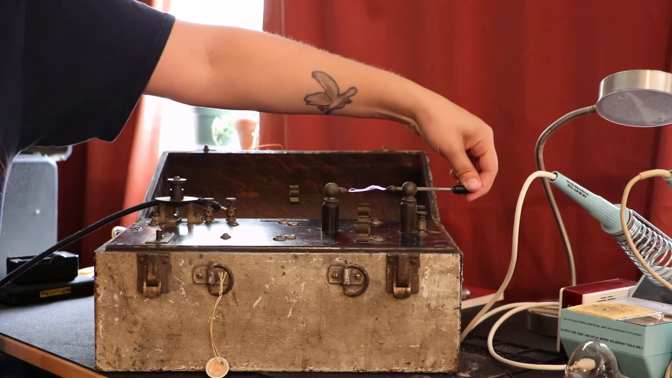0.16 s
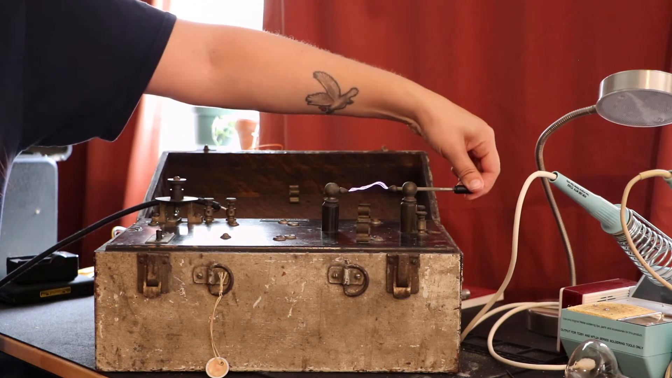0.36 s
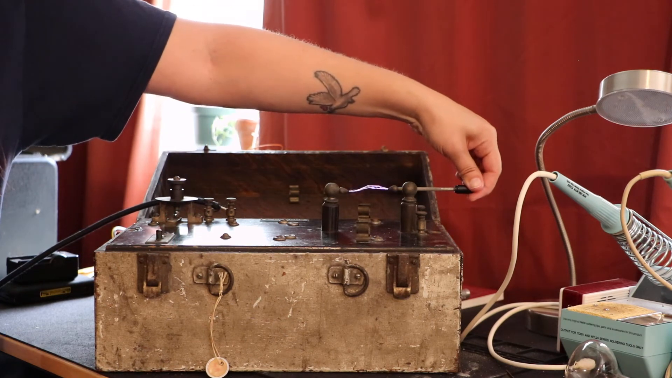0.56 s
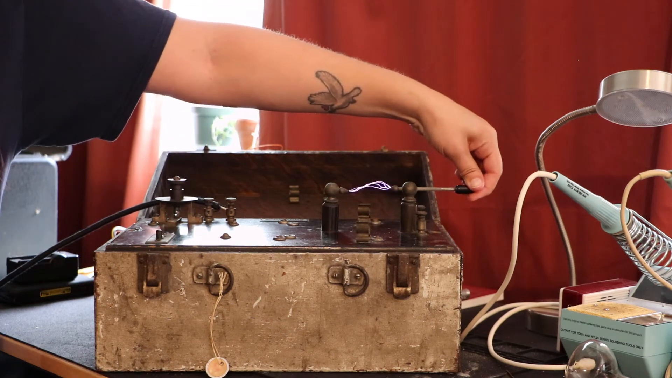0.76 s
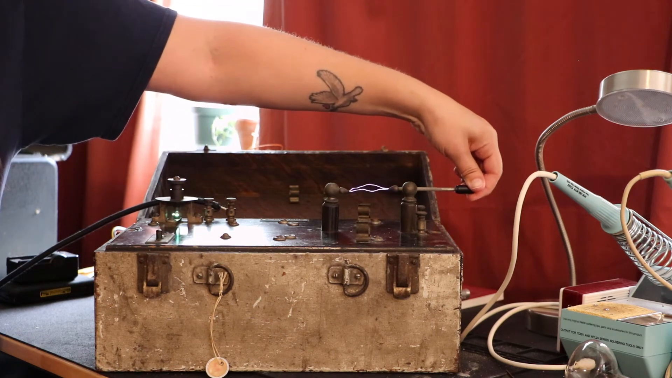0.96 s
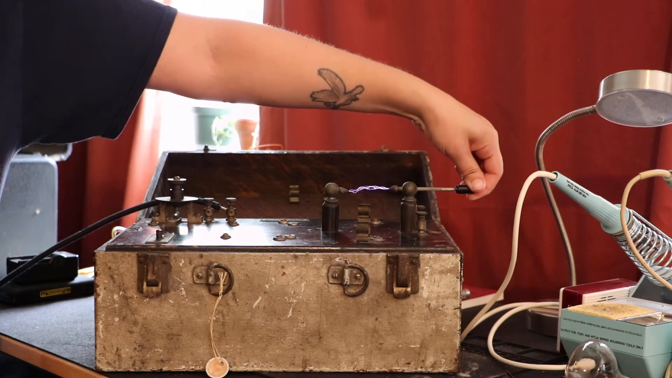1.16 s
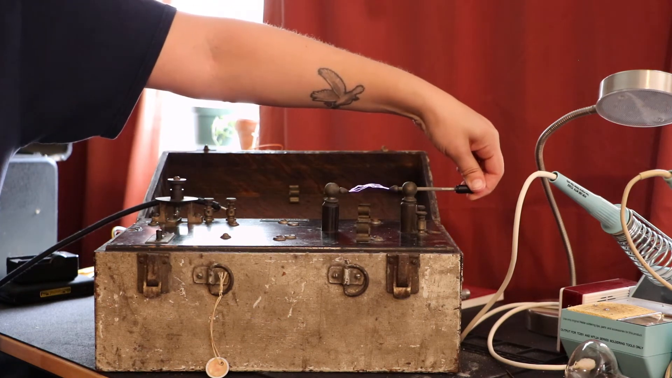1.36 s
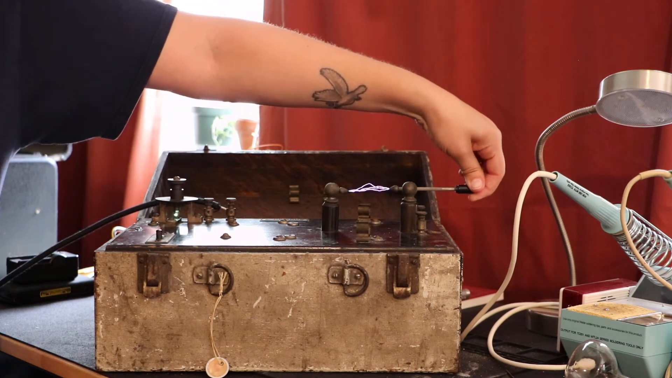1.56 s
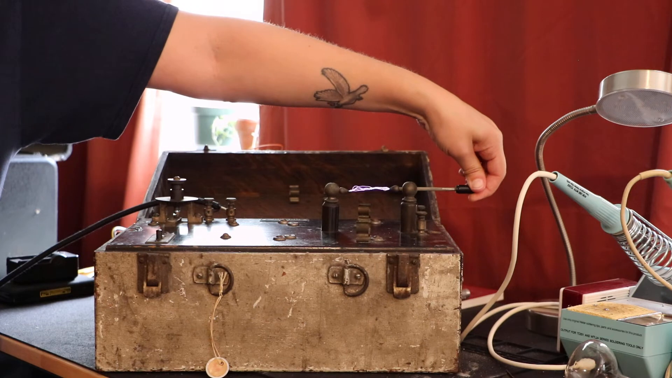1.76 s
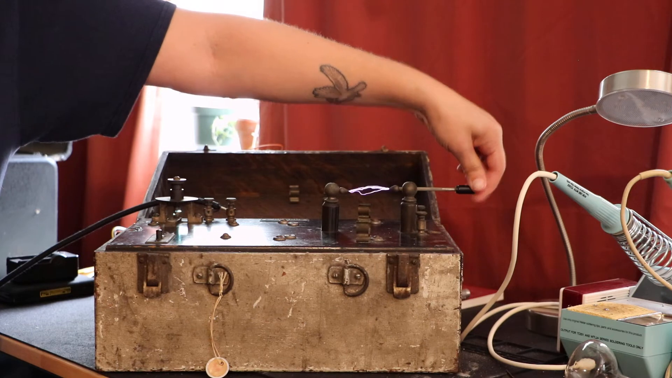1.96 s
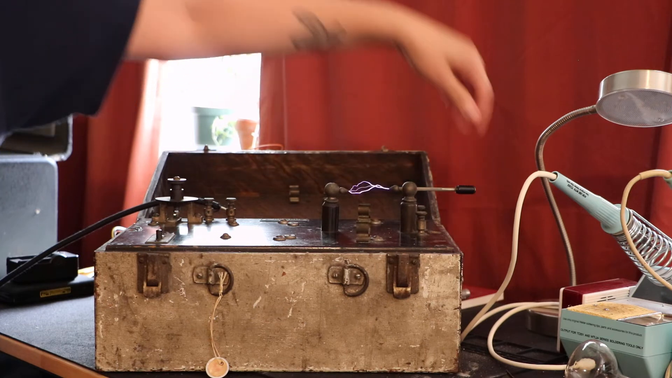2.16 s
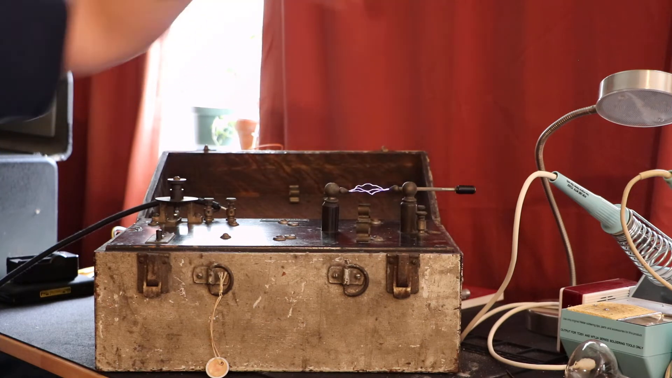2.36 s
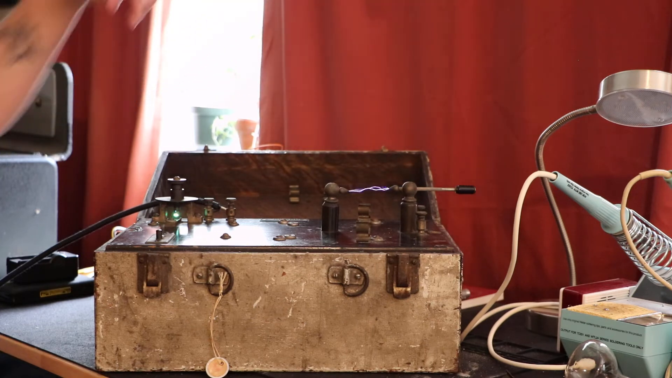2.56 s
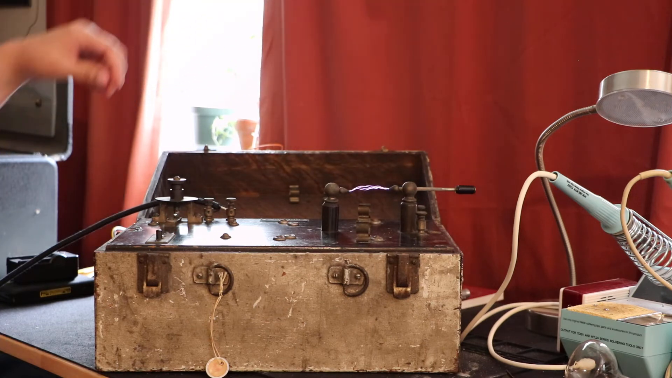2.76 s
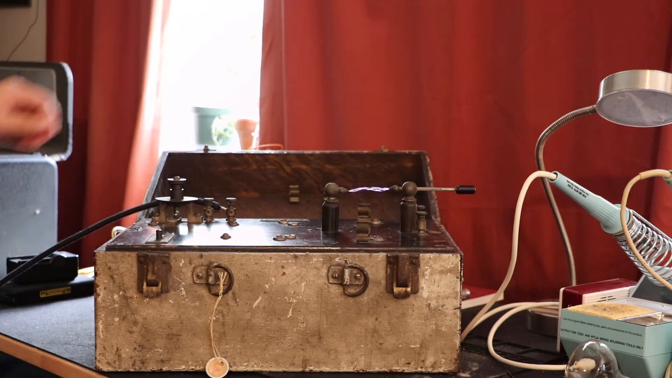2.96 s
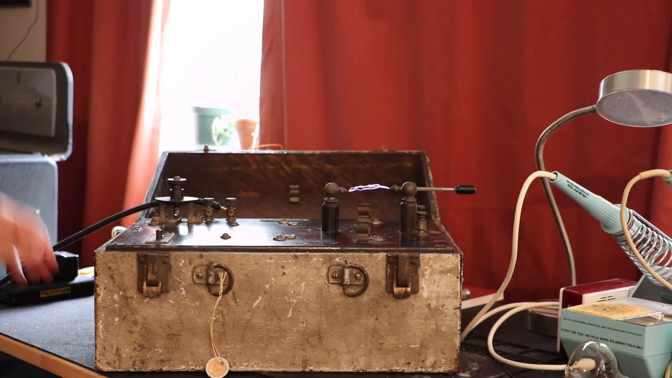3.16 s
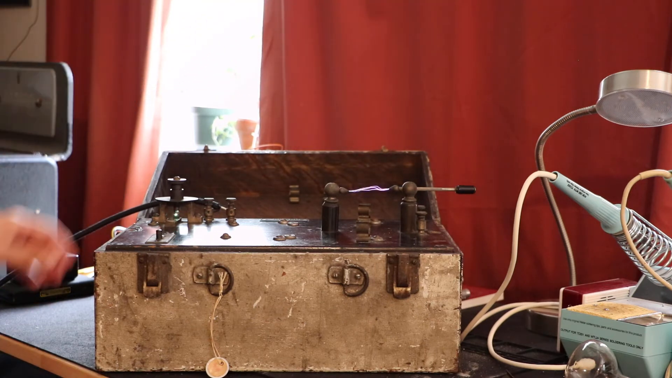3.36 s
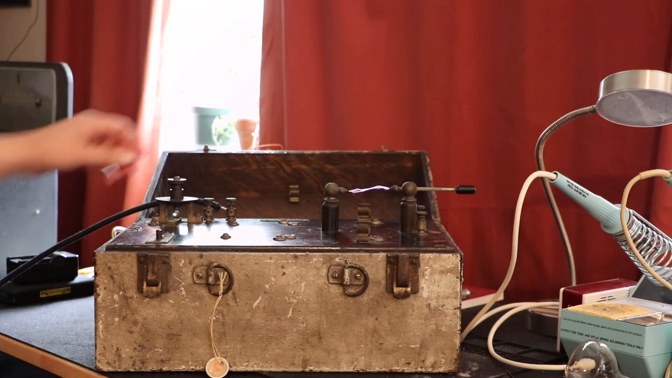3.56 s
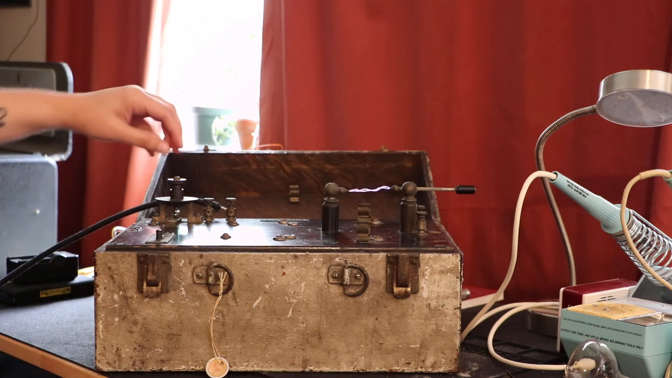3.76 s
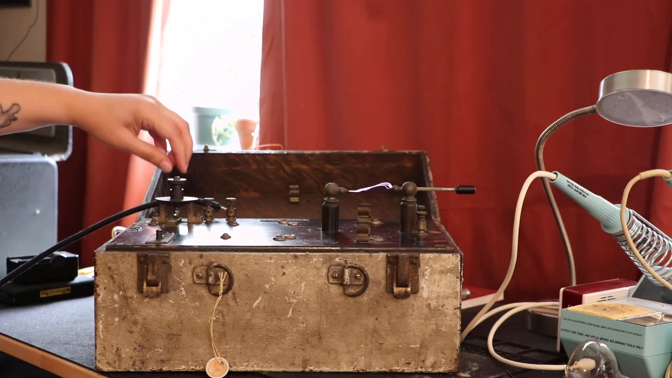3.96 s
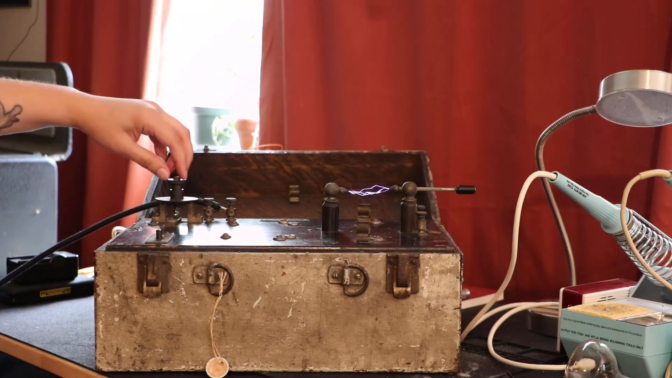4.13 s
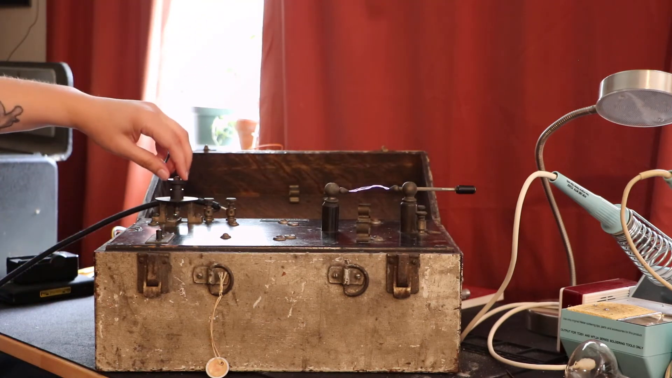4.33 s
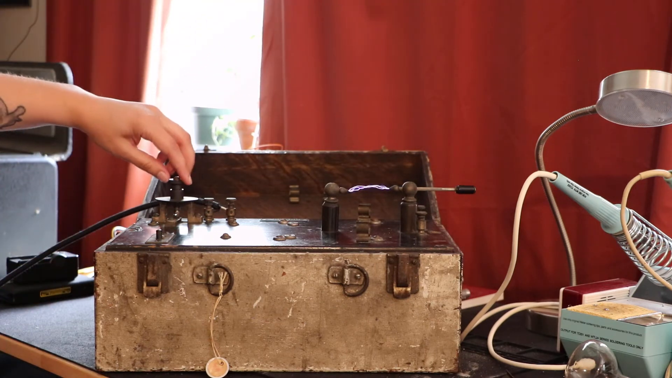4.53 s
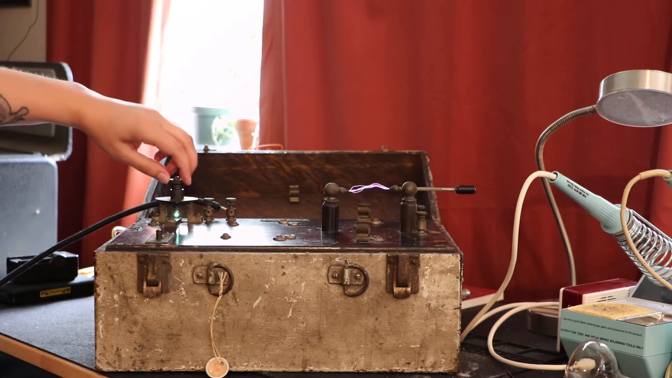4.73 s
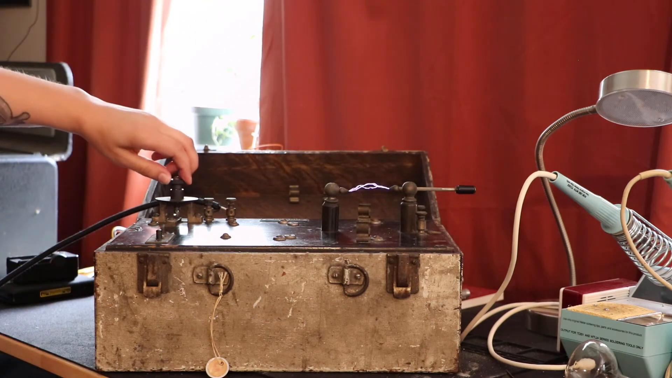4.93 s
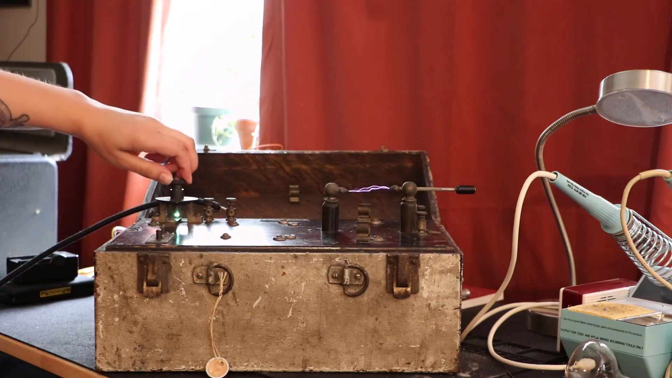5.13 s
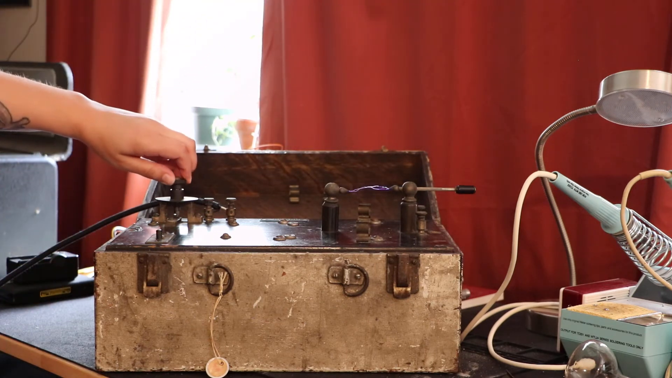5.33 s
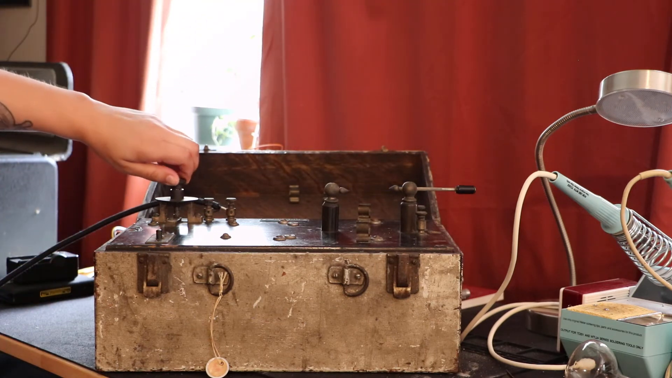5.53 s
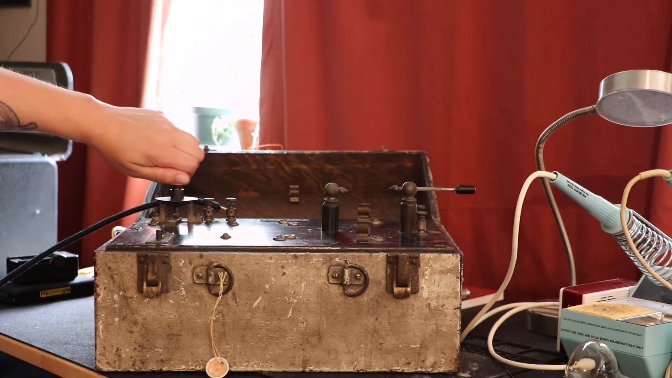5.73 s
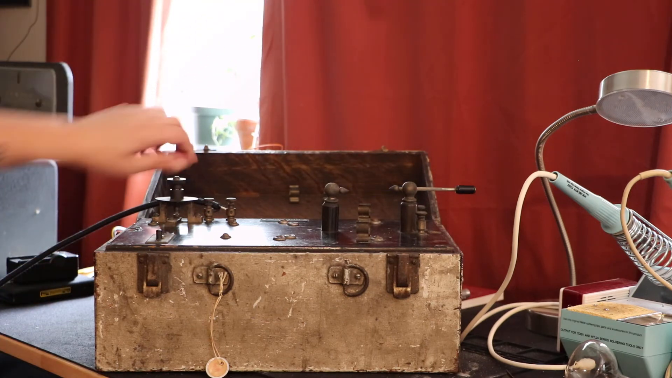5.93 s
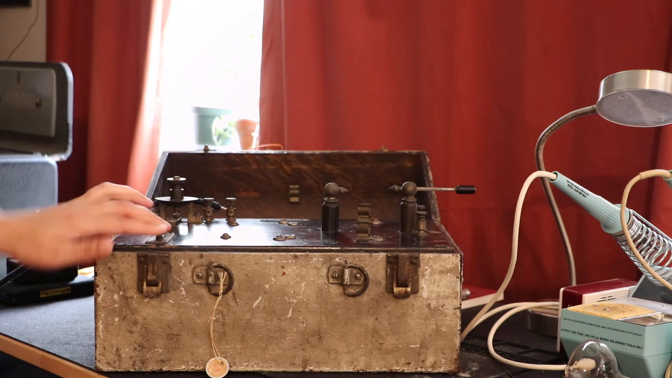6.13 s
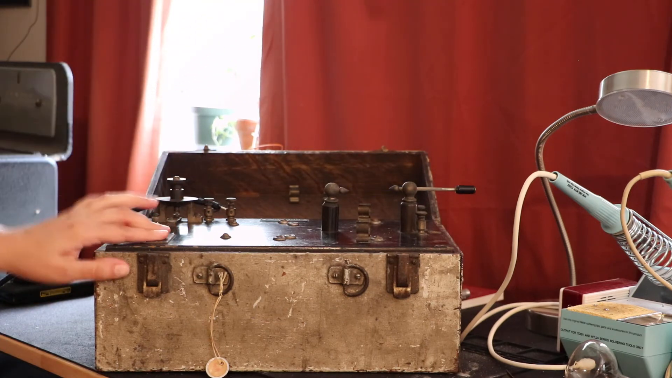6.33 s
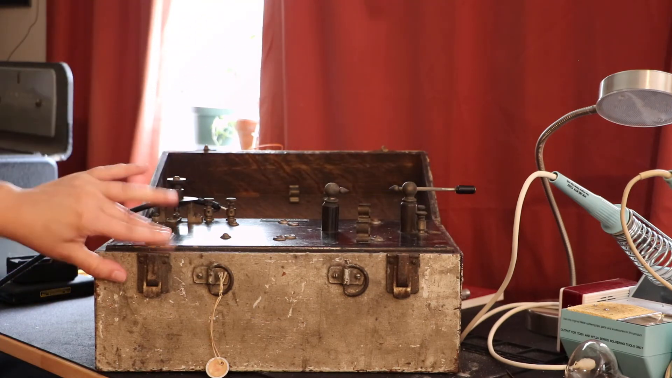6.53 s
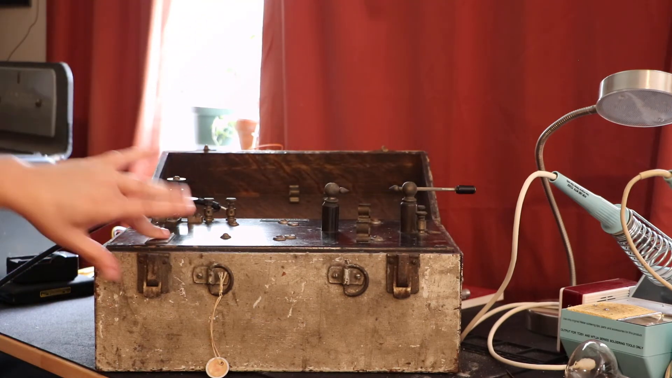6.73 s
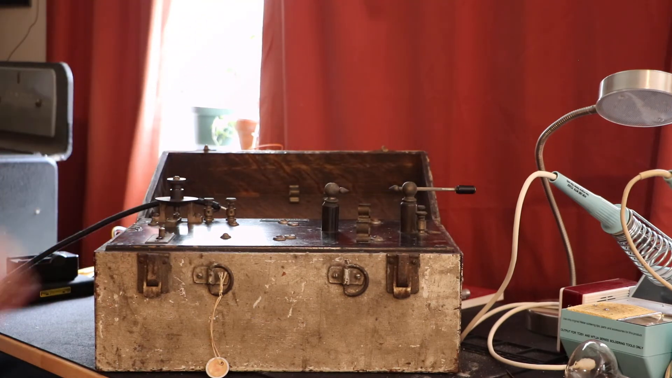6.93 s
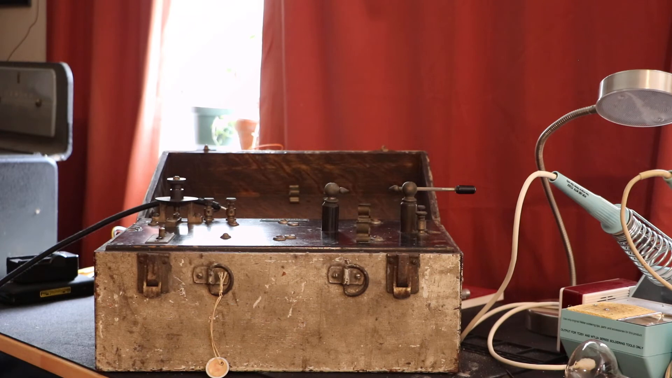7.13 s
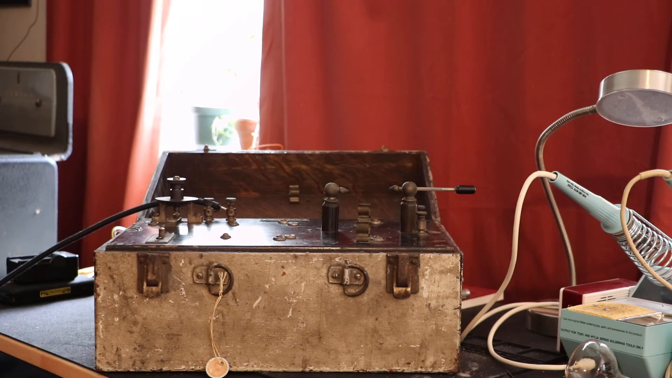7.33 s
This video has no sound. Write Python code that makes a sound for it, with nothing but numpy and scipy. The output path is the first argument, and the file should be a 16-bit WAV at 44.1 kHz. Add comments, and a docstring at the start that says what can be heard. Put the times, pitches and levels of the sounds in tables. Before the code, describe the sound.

Continuous harsh spark-gap buzzing, about 120 bursts a second, roughened by a vibrating armature and uneven louder cracks. The armature occasionally sticks and slaps. The sparking weakens, spits a last cluster and stops, the buzz sagging in pitch. Low appliance hum and room air rise, followed by faint thumps, a sharp switch snap and small metallic rattles. Close stereo pickup indoors, compressed by automatic gain, with short room reflections.

```python
"""An old high-frequency coil in a wooden case throws sparks across its gap in a quiet room that hums low.
From the start its armature buzzes and breaks the mains current; each crest fires a volley of spark pulses.
Big sparks crack after a short wait; from the second second on, the armature now and then sticks and slaps.
Then the sparks stop, the armature comes to rest, and the gain control lets the room air and hum rise.
Last, a hand thumps the case and snaps its switch, heard as filtered clicks and dying metal modes."""
import sys
import numpy as np
from scipy import signal
from scipy.fft import rfft, irfft
from scipy.io import wavfile
from scipy.ndimage import uniform_filter1d, minimum_filter1d

SR = 44100
rng = np.random.default_rng(int(sys.argv[2]) if len(sys.argv) > 2 else 0)


def wrap_up_sound(samples):
    """Save the sound to the file named by the first command line argument, as 16-bit audio."""
    columns = np.atleast_2d(samples).T
    # keep every value between -1 and 1, then stretch to whole-number steps
    tamed = np.clip(columns, -1, 1)
    steps = np.round(tamed * 32767).astype(np.int16)
    wavfile.write(sys.argv[1], SR, steps)


N = 325899
T = np.arange(N) / SR  # time in seconds
CREST_HZ, CREST_PHASE = 120, .9  # crests of the mains current per second; where in its cycle each falls
STOP_S = 5.42  # no mains firing after this
COIL_DB = 16  # lifts every sound of the running coil above the room


def gain_of(db):
    """Decibels to amplitude."""
    return 10 ** (np.asarray(db) / 20)


def evened(x):
    """Scales to rms 1."""
    return x / np.sqrt(np.mean(x ** 2) + 1e-20)


def read(points, hz, axis=1):
    """Reads one column of a table along log frequency."""
    table = np.transpose(points)
    return np.interp(np.log(hz + 1), np.log(table[0] + 1), table[axis])


def along(curve, s):
    """Reads a curve at the times s."""
    return np.interp(s, *np.transpose(curve))


def add(mix, s, sound):
    """Mixes a sound in at time s."""
    part = mix[max(round(s * SR), 0):][:len(sound)]
    part += sound[:len(part)]


def drift(rate_hz):
    """Slow random motion of rms 1; its spectrum falls away exponentially with frequency."""
    spectrum = rfft(rng.standard_normal(N))
    return evened(irfft(spectrum * np.exp(-np.fft.rfftfreq(N, 1 / SR) / rate_hz), N))


def click(colour, tilt_db=0, size=2048):
    """The sharpest causal (minimum-phase) pulse with this spectrum, peak 1."""
    hz = abs(np.fft.fftfreq(size, 1 / SR))
    db = np.maximum(read(colour, hz), -80) + tilt_db * np.log2(1 + hz / 1000)
    log_gain = np.log(gain_of(db))
    pulse = np.fft.ifft(np.exp(np.conj(signal.hilbert(log_gain)))).real
    return pulse / abs(pulse).max()


def impulses(s, size):
    """A train of single-sample kicks."""
    return np.bincount(np.clip(np.round(s * SR).astype(int), 0, N - 1), size, N)


def ring(modes):
    """Half a second of modes, each a cosine dying by 60 dB in its t60."""
    t = T[:SR // 2]
    return sum(gain_of(db - 60 * t / t60) * np.cos(2 * np.pi * hz * t) for hz, db, t60 in modes)


# Modes of the wooden case. Each row: frequency in Hz, relative level in dB, t60 in seconds.
CASE_MODES = [(229.5, -2, 0.26), (690, 6, 0.052), (775, 9, 0.046), (1113, 0, 0.21), (1380, -1.5, 0.12),
              (1598, 6.5, 0.17)]


def knock(colour, tilt_db=0, ring_db=-41, rattle=0.45, rattle_s=0.0035):
    """A blow on the case: a click, a brief rattle of the parts, and the ring of the wood."""
    t = T[:SR // 2]
    blow = rattle * rng.standard_normal(len(t)) * np.exp(-t / rattle_s)
    blow[0] = 1
    crack = signal.fftconvolve(blow, click(colour, tilt_db))[:len(t)]
    return crack / abs(crack).max() + gain_of(ring_db) * ring(CASE_MODES)


# Colour of the still room air. Each row: frequency in Hz, relative level in dB per Hz.
AIR_COLOUR = [(15, -40), (25, -24), (53, -24.5), (161, -14.5), (212, -20.5), (344, -20), (451, -18.5),
              (560, -19), (607, -21), (796, -18.5), (936, -22), (1790, -26.5), (16000, -50)]
AIR_DB = -47
# Steady hum of an appliance. Each row: frequency in Hz, rms level in dB.
HUM_TONES = [(59.2, -53), (157, -66), (339, -61)]


def background(hum_waver=0.47, wide_hz=700):
    """Still room air, alike at both ears in the bass, and the low hum of an appliance."""
    hz = np.fft.rfftfreq(N, 1 / SR)
    width = np.array([np.ones(len(hz)), hz / (hz + wide_hz)])
    noise = rfft(rng.standard_normal((2, N)))
    mid, side = irfft(noise * gain_of(read(AIR_COLOUR, hz)) * width, N)
    hum = np.zeros(N)
    for tone_hz, db in HUM_TONES:
        waver = hum_waver * drift(2.3) * tone_hz / HUM_TONES[0][0]  # radians
        hum += gain_of(db) * np.sin(2 * np.pi * tone_hz * T + waver)
    return gain_of(AIR_DB) * evened(np.array([mid + side, mid - side])) + np.sqrt(2) * hum


SAG_HZ, SAG_S = 43.98, .05  # loss of swing rate at a slap, and how long it takes to pick up


def stall():
    """How far the armature is knocked off its swing: 1 just after a slap, 0 when it runs freely."""
    return sum((T > s) * np.exp(-((T - s) / SAG_S) ** 2) for s, *_ in SLAP_EVENTS)


# Free swing of the armature, which wanders up and down, then slows as it comes to rest.
# Each row: time in seconds, swing rate in Hz before waver and sag.
SWING_RATE = [(0, 186.5), (1.4, 194.4), (1.7, 182.8), (2.4, 194.8), (3.1, 189), (3.45, 194), (4.1, 196.8),
              (5, 194.7), (5.36, 178.5), (5.42, 148), (5.52, 139), (5.6, 120)]


def armature_turns(waver=.018):
    """Cycles swung by the armature, which never keeps quite steady and loses speed at each slap."""
    swing_hz = (along(SWING_RATE, T) - SAG_HZ * stall()) * (1 + waver * drift(25))
    return np.cumsum(swing_hz) / SR


# Width of the armature's swing, until it comes to rest. Each row: time in seconds, relative level in dB.
SWING_WIDTH = [(0, -1), (1.4, 0), (1.6, 5), (1.95, -2), (2.6, -1.5), (3.1, 1), (4.1, 1.5), (4.22, -6),
               (4.65, -2.5), (5.05, -3.5), (5.3, -2), (5.42, -7.5), (5.53, -11), (5.6, -25), (5.7, -70)]
# Hum of the iron core. Each row: frequency in Hz, level in dB before the coil's lift.
CORE_TONES = [(120, -89), (240, -54.5), (360, -89)]


def buzz(turns, breaks, swing_db=-50.5, beat_db=-11, stall_db=-4, flutter=0.33,
         tick_db=-46, tick_waver_db=3, rest_s=5.63, settle_s=0.43,
         hum_flutter=0.4, hum_stop_s=5.36, hum_fade_s=0.055):
    """The armature's tone and its sum tone with the core, its contact's uneven tick, and the core's hum."""
    tone = np.sin(2 * np.pi * turns)
    tone = tone + gain_of(beat_db) * np.sin(2 * np.pi * (turns + 2 * CREST_HZ * T))
    swing = gain_of(swing_db + along(SWING_WIDTH, T) + stall_db * stall()) * tone
    swing = swing * (1 + flutter * drift(20.0))

    strengths = rng.exponential(1, len(breaks)) ** .5
    settling = np.clip((rest_s - T) / settle_s, 0, 1)
    kicks = impulses(breaks, strengths) * settling * gain_of(tick_waver_db * drift(7.3))
    tick = knock(SLAP_SPECTRUM, tilt_db=-4.5, rattle=0.065, ring_db=-15)
    ticks = gain_of(tick_db) * signal.oaconvolve(kicks, tick)[:N]

    core = sum(gain_of(db) * np.sin(2 * np.pi * hz * T) for hz, db in CORE_TONES)
    core = core * (1 + hum_flutter * drift(11.0)) * np.clip((hum_stop_s - T) / hum_fade_s, 0, 1)
    return ticks + np.sqrt(2) * (swing + core)


STUCK_BEFORE_S, STUCK_AFTER_S = .006, .0065  # the sparks drop out around each slap


def can_fire(s, drained_s=0.004):
    """No sparks while the armature sticks, while charge builds for a big spark, or just after one."""
    dead = [(at - STUCK_BEFORE_S, at + STUCK_AFTER_S) for at, *_ in SLAP_EVENTS]
    dead += [(at - wait, at + drained_s) for at, _, wait in BIG_SPARKS]
    return (s < STOP_S) & ~np.any([(s > start) & (s < end) for start, end in dead], axis=0)


# Strength of the sparking as the gap is adjusted. Each row: time in seconds, relative level in dB.
SPARK_STRENGTH = [(0, -20), (.5, -12), (.9, -14), (1.4, -11.5), (1.95, -10), (2.2, -14.5), (2.55, -14),
                  (4, -12), (5.4, -16.5)]
# Spells when the arc burns at another strength, mostly weaker.
# Each row: start in seconds, end in seconds, change in dB.
ARC_FALTERS = [(1.126, 1.155, 0), (1.476, 1.483, -25), (1.655, 1.695, -3), (2.14, 2.202, 1),
               (3.061, 3.156, -2.5), (3.521, 3.546, -4)]


def firings(breaks, crest_db=11.5, again_db=7.0, spread_db=0.35, jitter_s=.00022,
            early_s=.0012, late_s=.002, miss_share=0.016, again_share=.4):
    """Fires at each mains crest, or as the contact opens near it; sometimes weakly at the next opening."""
    crests = (np.arange(int(STOP_S * CREST_HZ)) + CREST_PHASE) / CREST_HZ
    count = len(crests)
    opening = np.searchsorted(breaks, crests - early_s)
    jittered = crests + jitter_s * rng.standard_normal(count)
    main = np.where(breaks[opening] < crests + late_s, breaks[opening], jittered)
    s = np.r_[main, breaks[opening + 1]]

    spread = np.clip(rng.standard_normal(2 * count), -2, 2)
    db = np.repeat([crest_db, again_db], count) + along(SPARK_STRENGTH, s) + spread_db * spread
    for start, end, change_db in ARC_FALTERS:
        db = db + change_db * ((s > start) & (s < end))
    fires = np.r_[rng.random(count) > miss_share, rng.random(count) < again_share]
    return s, gain_of(db) * (fires & can_fire(s))


# Big sparks: the gap holds off, charge builds, and one cracks.
# Each row: time in seconds, relative level in dB, wait before it in seconds.
BIG_SPARKS = [(0.2157, -9.5, .008), (0.3736, -5, .003), (.5745, -1, .004), (0.7074, 1, .004),
              (0.8587, -0.5, .004), (0.8897, -4, .006), (.9904, -5.5, .012), (1.032, -5.5, .008),
              (1.1731, 0.5, .004), (1.2581, -0.5, .006), (1.273, -6.5, .008), (1.5081, -1.5, .006),
              (1.5565, 5, .003), (1.6494, 2, .002), (1.6972, -5, .006), (1.7233, 4, .02), (1.741, -6, .005),
              (1.7576, 2.5, .006), (1.7742, -2, .005), (2.1072, 2, .003), (2.2409, 2.5, .004),
              (2.3073, -0.5, .003), (2.424, -4, .006), (2.6762, -0.5, .004), (2.7645, -1, .003),
              (2.9661, 0.5, .004), (3.099, -3.5, .004), (3.158, -4, .004), (3.1735, -0.5, .008),
              (3.2405, 0, .004), (3.275, -1.5, .004), (3.549, -1, .006), (3.6076, -2, .004),
              (3.815, -0.5, .005), (3.9244, -3, .004), (4.0331, -4, .004), (4.1761, -0.5, .004),
              (4.3076, -4.5, .005), (4.7003, -0.5, .004), (4.7577, -2, .004), (4.9743, -1, .002),
              (5.3415, -5, .016), (5.3461, -4.5, .002), (5.3597, -6.5, .004), (5.3661, -13, .003),
              (5.3919, -14, .004), (5.3988, -9, .004), (5.407, -8, .004), (5.4148, -9, .004),
              (5.448, -9, .02), (5.4642, -6, .01), (5.4758, -10, .004), (5.482, -11, .004)]
# Colour of a spark's snap. Each row: frequency in Hz, relative level in dB per Hz.
SPARK_SPECTRUM = [(30, -57), (150, -27), (420, -19.5), (520, -24), (700, -12), (790, -14.5), (900, -17),
                  (1130, -12.5), (1300, -16), (2200, -10.5), (2580, -9), (2850, -7), (3450, -3.5),
                  (4000, -2), (4400, -2.5), (5600, -4), (6200, -2.5), (7700, -0.5), (9500, -0.5),
                  (11500, 2), (13500, -2), (16000, -4)]
# Rods and posts of the gap, ringing at each spark.
# Each row: frequency in Hz, relative level in dB, t60 in seconds.
ROD_MODES = [(2620, 0.5, 0.077), (3420, -11, 0.16), (4410, 3, 0.087), (4620, -25, .45), (4770, -7, .4),
             (5020, -7, 0.15), (6850, 1, .1), (8231, -19, 0.44)]


def sparks(breaks, restrike_s=.00011, lead_s=.00042, count=8, first=0.71, branch=0.53, straight_db=2.0,
           crack_db=-1.0, crack_branch=0.86, rods_db=-53, body_db=-13, pop_hz=2800, pop_s=0.000099):
    """A snap amid restrikes: a straight channel snaps once and sharply, a crooked one spits longer, softer."""
    s, size = firings(breaks)
    straight = gain_of(straight_db * rng.uniform(-1.7, 1.7, len(s)))
    crack_s, crack_level, _ = np.transpose(BIG_SPARKS)
    crack_size = gain_of(crack_level + crack_db)

    snap = np.r_[first * size * straight, crack_size]
    fork = np.r_[branch * size / np.sqrt(straight), crack_size * crack_branch]
    length = np.r_[1 / straight, np.ones(len(crack_s))]
    s = np.r_[s, crack_s]
    train = impulses(s, snap)
    for k in range(count):  # the coil needs a moment to recharge between restrikes
        delay, polarity = rng.random((2, len(s)))
        strike_s = s + length * (restrike_s * (k + delay) - lead_s)
        train += impulses(strike_s, fork * np.sign(polarity - .5))
    voice = gain_of(rods_db) * ring(ROD_MODES)
    add(voice, 0, click(SPARK_SPECTRUM))

    # a big spark heats a fatter channel: a deeper pop
    body = impulses(crack_s, gain_of(crack_level + body_db))
    t = T[:SR // 100]
    pop = np.diff(np.sin(2 * np.pi * pop_hz * t) * t * np.exp(-t / pop_s))
    pops = signal.oaconvolve(body, pop / abs(pop).max())[:N]
    return signal.oaconvolve(train, voice)[:N] + pops


# The armature sticks and slaps its stop.
# Each row: time in seconds, relative level in dB, snap of its blade in dB relative to the slap.
SLAP_EVENTS = [(1.048, -20, -12), (1.215, -18.5, -1), (1.548, -19.5, -9), (2.141, -26.5, -15),
               (2.507, -20, -10), (2.641, -20.5, -12), (2.756, -18, -1), (4.714, -20, 3)]
# Colour of the slap. Each row: frequency in Hz, relative level in dB per Hz.
SLAP_SPECTRUM = [(30, -75), (140, -1.5), (400, -17), (560, -10), (690, 7), (770, 11.5), (900, -8.5),
                 (1000, -4), (1400, 0.5), (1850, -4.5), (2600, -1.5), (3500, -2), (4800, -24.5),
                 (16000, -12)]
# Steel blade of the armature. Each row: frequency in Hz, relative level in dB, t60 in seconds.
BLADE_MODES = [(2690, 7, .035), (2770, 0, .03), (3120, -2, .03), (3400, -18, .03), (3580, -6, .04)]


def slaps(slap_db=3.5, bounce_s=0.0038, bounce_db=-3):
    """Short dry clacks of the sticking armature; its steel blade snaps and bounces once."""
    out, blade = np.zeros(N), ring(BLADE_MODES)
    blade = blade / abs(blade).max()
    for s, db, snap_db in SLAP_EVENTS:
        clack = knock(SLAP_SPECTRUM, tilt_db=-2.0, ring_db=-48, rattle=0.61, rattle_s=0.0084)
        blade_db = db + slap_db + snap_db
        add(out, s, gain_of(db + slap_db) * clack)
        add(out, s, gain_of(blade_db) * blade)
        add(out, s + bounce_s * rng.uniform(0.71, 1.2), gain_of(blade_db + bounce_db) * blade)
    return out


# The switch is touched, then thrown. Each row: time in seconds, relative level in dB,
# treble tilt in dB per octave (well above 1 kHz), ring of its metal in dB, rattle from 0 to 1.
SWITCH_EVENTS = [(6.2, -41, 1, -40, 1), (6.371, -44, 3, -17, .9), (6.3875, -28, -4, -33, 0.8),
                 (6.3925, -28.5, -3.5, -12.5, 0.4), (6.403, -49, -5, -19, .5), (6.435, -52, -5, -24, 0.4),
                 (6.6233, -11.5, 3.5, -50, 0.7), (6.63, -15, 3.5, -31, .7), (6.873, -41, 5, -32, .7),
                 (6.882, -43, 3, -32, .4), (7.176, -47, -1, -24, 0.3)]
# Colour of the switch's click. Each row: frequency in Hz, relative level in dB per Hz.
SWITCH_SPECTRUM = [(30, -68), (130, -19), (240, -4), (430, -18.5), (590, -2.5), (690, 1.5), (800, -3.5),
                   (980, -6.5), (1130, -3), (1370, -1.5), (1700, -6), (2000, -6), (2300, -15), (2750, -7.5),
                   (3500, -9.5), (3900, -12), (4250, -12), (4950, -15), (6300, -13.5), (7200, -17.5),
                   (8400, -17.5), (10700, -29), (16000, -38)]
# Metal of the switch. Each row: frequency in Hz, relative level in dB, t60 in seconds.
SWITCH_MODES = [(1620, 3, 0.08), (2490, 7, 0.056), (2670, 7, .07), (2832, -4, 0.11), (3010, -10, .08),
                (3620, -2, 0.067), (5040, -4, 0.11), (5050, -2, .11), (6514, -10, 0.074), (8231, -20, .12),
                (9370, -8, 0.082), (13950, -21, .08)]
# The hand and the switch thump the case. Each row: time in seconds, relative level in dB, pitch in Hz.
CASE_BUMPS = [(6.179, -37, 64.4), (6.225, -43, 66), (6.391, -50, 233), (6.624, -41, 234),
              (6.633, -35.5, 66.4), (6.882, -42, 66)]


def hand(overtone=2.74, rise_s=0.0062, thud_s=0.026, snap_db=5):
    """Soft two-partial thuds of the hand on the case, and the click and metal ring of the switch."""
    out, t = np.zeros(N), T[:SR // 2]
    for s, db, tilt_db, metal_db, rattle in SWITCH_EVENTS:
        snap = knock(SWITCH_SPECTRUM, tilt_db, ring_db=-59, rattle=rattle, rattle_s=0.0026)
        metal = gain_of(metal_db) * ring(SWITCH_MODES)
        add(out, s, gain_of(db) * (gain_of(snap_db) * snap + metal))
    for s, db, thud_hz in CASE_BUMPS:
        thud = np.sin(2 * np.pi * thud_hz * t) + 0.47 * np.sin(2 * np.pi * overtone * thud_hz * t)
        add(out, s, gain_of(db) * thud * (1 - np.exp(-t / rise_s)) * np.exp(-t / thud_s))
    return out


def shiver(level_db=-19, tilt_db=-0.5, fade_s=0.055):
    """Loose fittings of the case shiver after each sound of the switch: a dense, even, dying rattle."""
    shake = sum(gain_of(db) * (T > s) * np.exp(-abs(T - s) / fade_s) for s, db, *_ in SWITCH_EVENTS)
    noise = signal.oaconvolve(rng.standard_normal(N), click(SWITCH_SPECTRUM, tilt_db))[:N]
    return gain_of(level_db) * shake * evened(noise)


# Reflections from lid, table and walls. Each row: delay in ms, level in dB before each source's trim.
REFLECTIONS = [(.265, -15), (2.05, -9.5), (2.38, -8.5), (4.345, -4), (4.592, -9), (11.63, -11)]
# The room's tail. Each row: frequency in Hz, t60 in seconds before linger, side share, relative level in dB.
ROOM_TAIL = [(147, 0.75, 0.6, 0.5), (615, 0.44, 0.27, 12), (1600, 0.39, 0.77, 4), (4200, 0.47, 1, 1.5),
             (7350, 0.38, 0.89, 5.5), (12000, 0.28, 1, -0.5), (16200, 0.2, 1, 2)]


def room(x, tail_db=0, echo_db=0, linger=1, build_s=0.003, lean=0.086, size=256):
    """Direct sound, a few hard reflections, and a diffuse noise tail with its own decay in each band."""
    hz, t, z = signal.stft(rng.standard_normal((2, SR)), SR, nperseg=size)
    decay_db = 60 * t / (linger * read(ROOM_TAIL, hz)[:, None])
    z = z * gain_of(read(ROOM_TAIL, hz, axis=3)[:, None] - decay_db)
    z[1] *= read(ROOM_TAIL, hz, axis=2)[:, None]
    tail = signal.istft(z, SR, nperseg=size)[1][:, :SR]
    mid, side = tail * (1 - np.exp(-T[:SR] / build_s))
    response = gain_of(tail_db) * np.array([mid + side, mid - side]) / np.linalg.norm(mid + side)
    response[:, 0] += 1  # direct sound
    for k, (ms, db) in enumerate(REFLECTIONS):
        sides = 1 + lean * (-1) ** k * np.array([[-1], [1]])  # leans to either side in turn
        response += gain_of(db + echo_db) * sides * np.sinc((T[:SR] - ms / 1000) * SR)
    return signal.fftconvolve(x[None], response, axes=1)[:, :N]


def scene():
    """The running coil, the hand at the switch, and the room."""
    turns = armature_turns()
    breaks = T[1:][np.diff(np.floor(turns)) > 0]  # the contact opens once a swing
    coil = room(sparks(breaks), tail_db=-0.5, echo_db=-2.5) * gain_of([[-.3], [.3]])
    coil = coil + room(slaps(), tail_db=-7.5, echo_db=-8.0, linger=.95) + buzz(turns, breaks)
    switch = room(hand(), tail_db=-0.5, echo_db=-12.0, linger=0.82) + shiver()
    return gain_of(COIL_DB) * coil + switch + background()


def record(dry, limit_db=-23, slope=0.9, fall_db_per_s=135, sense_s=0.049, hold_s=0.05, edge_hz=15850):
    """Gain control ducks on recent power, holds, then recovers; peaks saturate; then the band limit."""
    span, hold = 2 * int(sense_s * SR / 2) + 1, 2 * int(hold_s * SR / 2) + 1
    power = uniform_filter1d((dry ** 2).mean(0), span, origin=span // 2)
    over_db = np.maximum(10 * np.log10(abs(power) + 1e-12) - limit_db, 0)
    held_db = -minimum_filter1d(-over_db, hold, origin=hold // 2)
    # the held excess rises at once but falls no faster than a straight ramp
    ramp_db = fall_db_per_s * T
    excess_db = np.maximum.accumulate(held_db + ramp_db) - ramp_db
    out = np.tanh(dry / gain_of(slope * excess_db))
    low_pass = signal.firwin(301, edge_hz, window=("kaiser", 8), fs=SR)
    return signal.oaconvolve(out, low_pass[None], "same")


dry = scene()
out = record(dry)
wrap_up_sound(out)
```